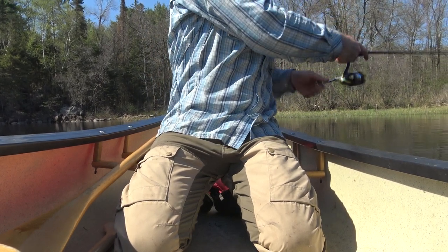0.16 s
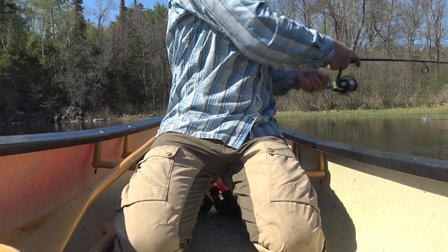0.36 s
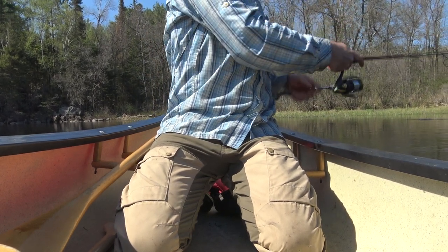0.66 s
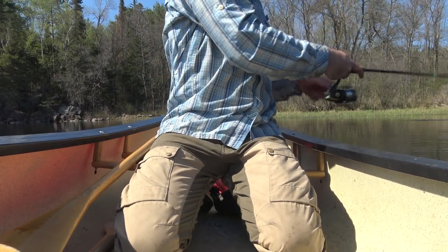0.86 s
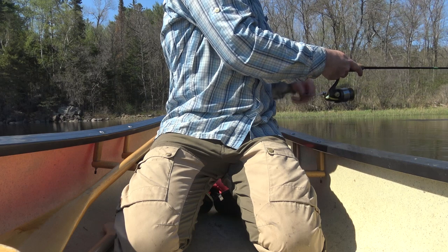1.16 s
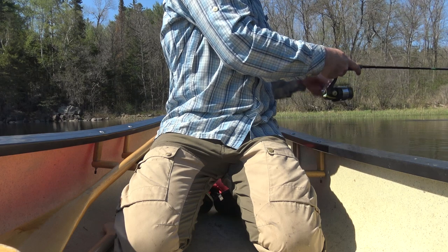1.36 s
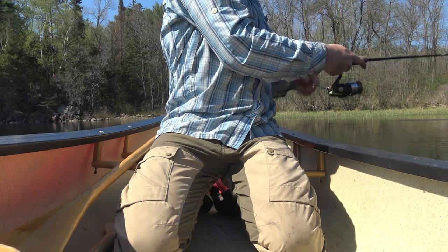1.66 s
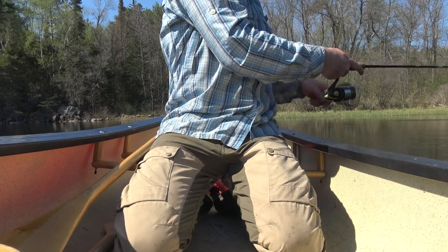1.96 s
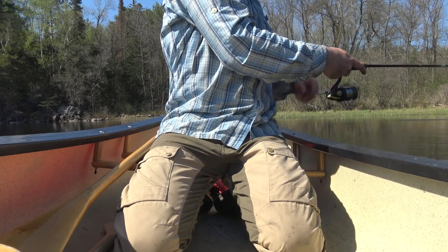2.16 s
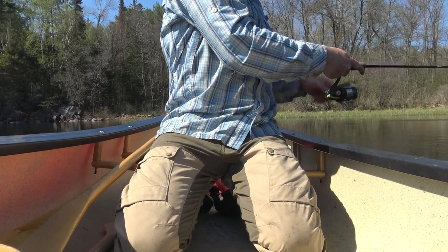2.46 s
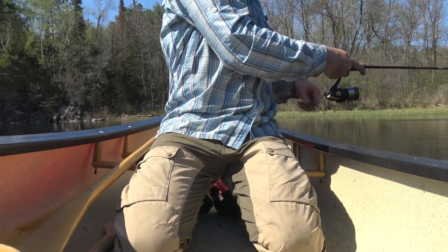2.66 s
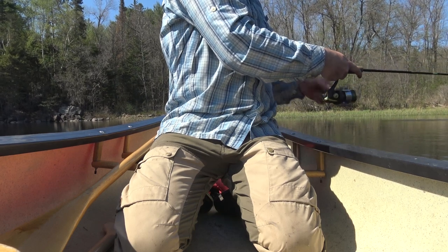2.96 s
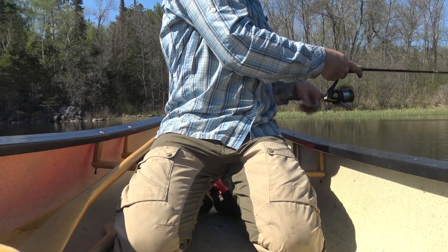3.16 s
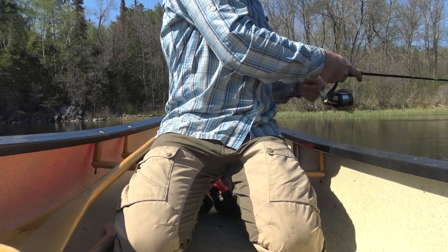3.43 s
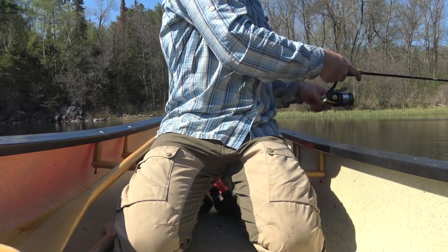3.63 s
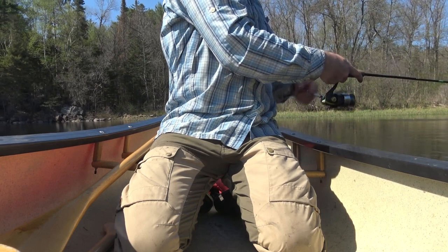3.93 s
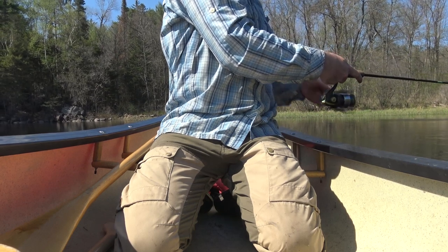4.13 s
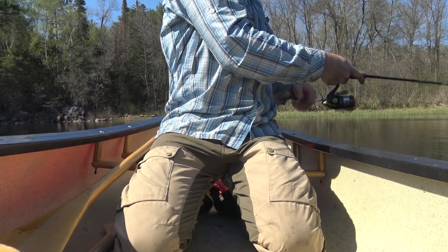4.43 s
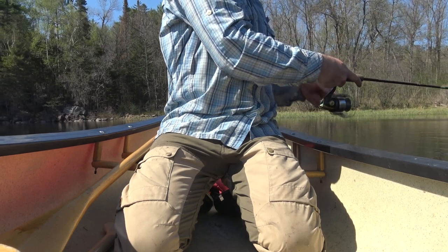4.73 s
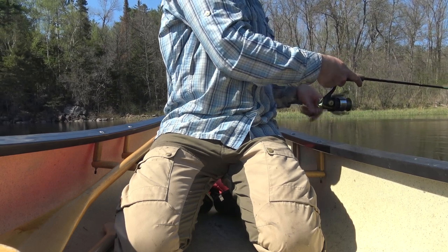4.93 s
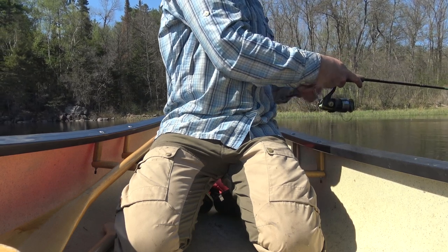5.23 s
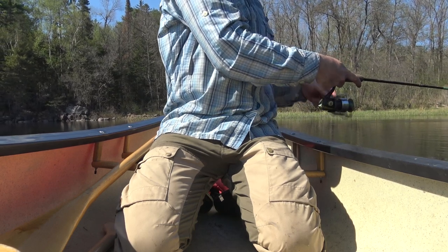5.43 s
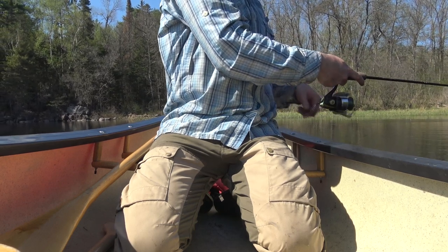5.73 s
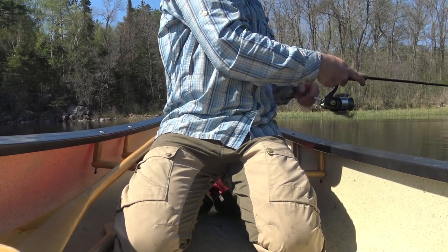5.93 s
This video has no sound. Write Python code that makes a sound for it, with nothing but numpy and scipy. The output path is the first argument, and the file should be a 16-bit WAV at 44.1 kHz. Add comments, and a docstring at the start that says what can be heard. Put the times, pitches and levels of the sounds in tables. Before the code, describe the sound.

Heard from a canoe on a calm lake, several toads hold long, fast-pulsed musical trills at different pitches, over a blurred distant chorus. Early on a fishing reel snaps shut very close with a sharp metallic clatter, soft brushing and a few water drops plinking. Small water laps follow, then sparse faint ticks and one dull hull knock. Breeze rumbles softly on the single microphone, and a far motor hums low near the end.

```python
"""Toads trill around a lake, heard from a canoe: trains of short tone pulses that swell, hold and slow as the toad tires.
Near callers overlap in front of a blurred, noise-made chorus, and the wooded shore answers with a diffuse tail.
Close by, a fishing reel snaps shut with soft thumps and ticks (struck resonances), line and sleeve brush (grains of
noise) and drops plink (rising bubble tones). Then water laps and a knock sounds on the hull (short thuds of tone and
noise). Behind are a far motor (one wavering sine) and a breeze rumbling on the microphone (shaped noise)."""
import sys
import numpy as np
from scipy import signal
from scipy.fft import rfft, irfft, next_fast_len
from scipy.io import wavfile
from scipy.ndimage import map_coordinates

SR = 44100
rng = np.random.default_rng(int(sys.argv[2]) if len(sys.argv) > 2 else 0)


def to_wav(sig):
    """Store sig (one row per channel, or 1-D mono) as 16-bit WAV at the path in sys.argv[1].

    Samples outside -1..1 are clipped; the rate is SR.
    """
    pcm = np.clip(np.atleast_2d(sig), -1, 1) * 32767
    pcm = np.round(pcm).astype(np.int16)
    wavfile.write(sys.argv[1], SR, pcm.T)  # frames by channels


N = 268569

# Relative spectrum of brushing friction, also of the splat of a drop: f/Hz, level/dB per Hz
RUSTLE_SPECTRUM = [(400, -33), (1100, -15), (2400, 3.5), (4200, 0.5), (6500, -17.5), (9000, -31),
                   (15000, -29)]


def amp(db):
    """Decibels to gain."""
    return 10 ** (np.asarray(db) / 20)


def unit(x):
    """Scale to rms 1."""
    return x / np.sqrt(np.mean(x ** 2) + 1e-20)


def along(points, hz):
    """Read (Hz, value) points on a log axis."""
    f, v = np.transpose(points)
    return np.interp(np.log(hz + 1), np.log(f + 1), v)


def curves(rows):
    """One value per sample for each column after the time."""
    s, *cols = np.transpose(rows)
    return [np.interp(np.arange(N) / SR, s, c) for c in cols]


def wobble(rate):
    """A smooth random curve, rate knots a second."""
    knots = rng.standard_normal(int(N * rate / SR) + 4)
    return map_coordinates(knots, [np.arange(N) * rate / SR])


def filtered(x, response):
    """x times a response of frequency."""
    m = next_fast_len(len(x) + 8192)
    return irfft(rfft(x, m) * response(np.fft.rfftfreq(m, 1 / SR)), m)[:len(x)]


def noise(spectrum):
    """Coloured noise of rms 1."""
    return unit(filtered(rng.standard_normal(N), lambda hz: amp(along(spectrum, hz))))


def add(track, s, sound):
    """Mix a sound into a track at time s."""
    part = track[max(round(s * SR), 0):][:len(sound)]
    part += sound[:len(part)]


def toads():
    """Near callers keep crisp pulses; the distant ones blur into a chorus of noise."""
    # When each near toad trills: start/s, end/s
    calls = [(-1, .66), (-1, 2.24), (-1, 2.35), (.6, 5.4), (.975, 5.41), (1.3, 5.02), (2.72, 6.6),
             (5.88, 7)]
    # Voice of each, in the same order; the fourth sits further along the shore:
    # pitch before scoop and sag f/Hz, basic pulse rate/(1/s), slowing/(share a second), held level/dB,
    # swell/s, fade/s, burst/s, ring/s, overtone/dB, noise skirt/dB, echo/dB
    voices = [(1930, 56, .03, -19, .1, 0.069, .0051, 0.0011, -28.5, -31, -14),
              (1800.5, 62.5, .005, -19.5, .1, 0.015, 0.0094, 0.00039, -28.5, -26.5, -21),
              (1812, 58.8, .012, -24.5, .1, 0.063, 0.0057, 0.0005, -29, -31.5, -20),
              (1737, 73, .03, -31.5, 0.38, 0.35, .0073, 0.00081, -21, -22.5, -7.5),
              (1493.5, 67.3, .029, -15.5, .065, 0.0023, 0.0064, 0.0042, -44, -27.5, -15.5),
              (1916, 60, .04, -31, 0.62, .01, 0.0045, 0.0021, -25, -15.5, -9.5),
              (1732, 65.6, .02, -20, 0.15, .01, 0.0077, .00057, -39.5, -38.5, -25),
              (1812, 68, .03, -22.5, .06, .01, .008, .001, -45, -37, -10.5)]
    # Relative spectrum of the whole lake's blurred chorus: f/Hz, level/dB per Hz
    chorus_spectrum = [(700, -34), (1000, -21), (1200, -11.5), (1400, -1.5), (1750, -2.5), (2000, -22),
                       (2600, -24), (3200, -26), (3400, -26.5), (3650, -43.5), (6000, -46)]
    near = sum(trill(*call, *voice) for call, voice in zip(calls, voices))
    chorus = amp(-36 + wobble(6.6)) * noise(chorus_spectrum)
    return near + chorus


def trill(start, end, pitch_hz, pulse_rate, slowing, level_db, swell_s, fade_s,
          burst_s, ring_s, overtone_db, skirt_db, echo_db):
    """A toad: the larynx lets through one burst of tone per pulse and the vocal sac rings on after it."""
    # Skirt: relative spectra of the faint noise spread around each pulse's tone,
    # one for high trills, one for the deep trill: f/Hz, level/dB per Hz
    high_skirt = [(600, -25), (1000, 1.5), (1300, 5.5), (2200, 2.5), (2600, -0.5), (3250, -6), (3900, -8),
                  (4400, -12.5), (5200, -15), (5900, -36.5), (9000, -38)]
    deep_skirt = [(600, -25), (1000, 5.5), (1300, 8), (2200, 1.5), (2600, -2.5), (2950, 2), (3300, -10.5),
                  (3650, -11.5), (3920, -2), (4300, -14), (5100, -12.5), (5900, -35.5), (9000, -38.5)]
    deep_below_hz = 1600
    swell_db = 23  # a trill grows from, and dies to, this far below its held level
    scoop, scoop_s = 0.11, 0.076  # the pitch starts flat by this share while the vocal sac fills
    sag_hz_per_s = 5.5
    eager, eager_s = 0.04, 0.25  # the first pulses come faster by this share
    spent, spent_s = 0.1, 0.22  # the last ones drag by this share
    glide = -0.0065  # pitch slide within one burst (share)
    upper_ratio = 1.965  # the overtone lies just under the octave

    now = np.arange(N) / SR
    age, left = np.maximum(now - start, 0), np.maximum(end - now, 0)
    haste = 1 + eager * np.exp(-age / eager_s) - spent * np.exp(-left / spent_s) + 0.005 * wobble(5)
    rate = pulse_rate * np.exp(-slowing * age) * haste
    bent = 1 - scoop * np.exp(-age / scoop_s) + 0.00067 * wobble(4)
    pitch = (pitch_hz - sag_hz_per_s * age) * bent
    drop_db = swell_db * (np.exp(-age / swell_s) + np.exp(-left / fade_s))
    level = level_db - drop_db + 0.5 * wobble(3.95)

    # A pulse starts whenever the running count passes a whole number.
    cycles = np.cumsum(rate * ((now >= start) & (now < end))) / SR
    onsets = np.flatnonzero(np.diff(np.ceil(cycles), prepend=0))

    t = np.arange(SR // 40) / SR
    progress = np.minimum(t / burst_s, 1)
    burst = np.sin(np.pi * progress)
    shape = signal.lfilter([1], [1, -np.exp(-1 / (ring_s * SR))], burst)
    shape /= np.sqrt(np.sum(shape ** 2) / SR)
    bend = 1 + glide * (progress - 0.5)

    tone, gate = np.zeros(N), np.zeros(N)
    for i, (turn, size, detune) in zip(onsets, rng.uniform(-0.89, 1, size=(600, 3))):
        # The vocal cords start afresh in every pulse, with a random phase.
        pulse_hz = pitch[i] * (1 + 0.0015 * detune)
        phase = np.pi * turn + 2 * np.pi * pulse_hz * np.cumsum(bend) / SR
        pulse = shape * amp(level[i] + 0.7 * size) / np.sqrt(rate[i])
        add(tone, i / SR, pulse * (np.sin(phase) + amp(overtone_db) * np.sin(upper_ratio * phase)))
        add(gate, i / SR, pulse)
    skirt = noise(deep_skirt if pitch_hz < deep_below_hz else high_skirt)
    voice = tone + amp(skirt_db) * gate * skirt
    return voice + amp(echo_db) * shore(voice)


def shore(x):
    """Diffuse answer of the trees, as strong as the sound itself: noise whose treble dies sooner."""
    # How long the wooded shore answers: f/Hz, t60/s
    decay = [(300, 0.75), (1800, 0.47), (6000, 0.052)]
    hz, t, z = signal.stft(rng.standard_normal(SR), SR, nperseg=256)
    fade = amp(-60 * t / along(decay, hz)[:, None])
    tail = signal.istft(z * fade, SR, nperseg=256)[1]
    return signal.fftconvolve(x, tail / np.linalg.norm(tail))[:N]


def reel():
    """The bail snaps over and rattles, then the gears tick: each contact strikes body and wire resonances."""
    # Contacts, first the bail snapping shut, then single ticks:
    # t/s, level/dB (before a common lift), brightness f/Hz, ring of the bail/dB
    contacts = [(.2646, -8.5, 13000, -5), (0.2723, -12.5, 4500, -2.5), (0.2768, -16.5, 16000, -6),
                (0.2836, -15.5, 9040, -6.5), (0.2916, -11, 18000, -8), (.2958, -13, 2980, -3.5),
                (.3042, -10, 13020, -7), (0.353, -17.5, 3820, -11.5), (.421, -25.5, 3000, -12),
                (.455, -28.5, 3500, -15), (0.538, -34.5, 8150, -14), (1.0132, -26, 5960, -9),
                (1.1954, -33.5, 3000, -9), (1.415, -26.5, 3540, -16), (1.883, -24, 2500, -10),
                (2.987, -33.5, 4500, -15), (3.586, -27.5, 3600, -19), (4.187, -27.5, 1960, -12),
                (5.4348, -32, 4500, -18), (5.851, -38, 3000, -16)]
    lift_db = 5.0
    # Resonances of the reel's body and wire bail: f/Hz, width/Hz, level/dB
    body_modes = [(1577, 166, 14), (2196, 123, 15), (3960, 950, -5), (6700, 1500, -4), (10300, 4900, -6.5),
                  (14500, 740, 0.5)]
    # Ring of the wire bail: f/Hz, level/dB (mean of a random spread), t60/s
    bail_modes = [(1450, -22, 0.22), (2176, -11, 0.067), (2292, -9.5, 0.07), (2365, -13, 0.098),
                  (2450, -18.5, .06), (2720, -26.5, 0.011), (3740, -23.5, 0.04), (3900, -19.5, 0.029),
                  (5200, -26.5, 0.053), (6570, -27.5, 0.035)]
    crack_t60_s, chatter_db, chatter_t60_s = 0.011, -17, 0.04

    def body(f):
        """Sum of the resonances with alternating signs."""
        return sum((-1) ** k * amp(db) * 1j * f * w / (c * c - f * f + 1j * f * w)
                   for k, (c, w, db) in enumerate(body_modes))

    out, t = np.zeros(N), np.arange(SR // 8) / SR
    for s, db, bright_hz, ring_db in contacts + rattle(count=10):
        decay = amp(-60 * t / crack_t60_s) + amp(chatter_db - 60 * t / chatter_t60_s)
        contact = 1.2 * rng.standard_normal(len(t)) * decay
        contact[0] += 3.5  # the hard first touch
        ring = sum(amp(level + rng.normal(0, 2) - 60 * t / life) * np.sin(2 * np.pi * (hz * t + rng.random()))
                   for hz, level, life in bail_modes)
        strike = filtered(contact, body) + amp(ring_db) * ring
        # A lower brightness makes a duller contact.
        coloured = filtered(strike, lambda f: 1 / (1 + 1j * f / bright_hz) ** 2)
        add(out, s, amp(db + lift_db) * coloured)
    return out


def rattle(count):
    """Loose contacts of the bail at random moments, ever weaker, as rows like those of the reel."""
    from_s, to_s = 0.39, 0.55
    first_db, loss_db_per_s = -30, 35  # before the reel's common lift
    bright_hz, ring_db = 4500, -8.5
    slots = (np.arange(count) + rng.random(count)) / count
    waits = slots * (to_s - from_s)
    return [(from_s + wait, first_db - loss_db_per_s * wait, bright_hz, ring_db) for wait in waits]


def rustle():
    """Line and sleeve brush: dense, clumped grains of friction; each brush rises quickly and fades."""
    # Brushes of line and sleeve: t/s, level/dB
    brushes = [(-.03, -46), (.26, -40), (.53, -50)]
    rise_s, fade_db_per_s = 0.018, 35.5
    stroke, t = np.zeros(N), np.arange(N) / SR
    for s, db in brushes:
        age = np.maximum(t - s, 0)
        stroke += amp(db - fade_db_per_s * age) * (1 - np.exp(-age / rise_s))
    clumps = amp(2.5 * wobble(70) + 3.5 * wobble(500))
    return stroke * unit(noise(RUSTLE_SPECTRUM) * clumps)


def drops():
    """Each drop splats and traps a small bubble whose pitch rises as it dies away."""
    # Drops plinking on the water beside the canoe: t/s, level/dB, starting pitch f/Hz
    plinks = [(.352, -22, 2300), (0.3965, -13.5, 2280), (0.419, -29, 2600), (.495, -20.5, 2300)]
    bubble_t60_s, splat_db, splat_t60_s = 0.036, -17, 0.025
    out, t = np.zeros(N), np.arange(SR // 16) / SR
    for s, db, hz in plinks:
        phase = 2 * np.pi * np.cumsum(hz * (1 + 0.2 * t / bubble_t60_s)) / SR
        bubble = amp(-60 * t / bubble_t60_s) * (1 - np.exp(-t / 0.0005)) * np.sin(phase)
        splat = amp(splat_db - 60 * t / splat_t60_s) * noise(RUSTLE_SPECTRUM)[:len(t)]
        add(out, s, amp(db) * (bubble + splat))
    return out


def thumps_laps_and_knock():
    """Short thuds: thumps with the reel's snap, then laps of water at the hull, and a knock that rings it."""
    # Thumps with the reel's snap (first three), then laps of water at the hull: t/s, level/dB, f/Hz
    thuds = [(.27, -41.5, 430), (.308, -32, 666), (.38, -38.5, 583), (.575, -30, 1090), (.609, -29.5, 1310),
             (.635, -38, 780), (.803, -40.5, 687), (5.062, -43.5, 412)]
    # Resonances of the knocked hull: f/Hz, level/dB (relative to the knock), t60/s
    modes = [(175, -3.5, .13), (305, -5, .1), (510, 1.5, .07)]
    thud_cycles = 81  # a thump or lap falls by 60 dB within this many cycles
    knock_s, knock_db = 2.403, -36
    out = np.zeros(N)
    for s, db, hz in thuds:
        add(out, s, amp(db) * thud(hz, thud_cycles / hz))
    knock = sum(amp(db) * thud(hz, t60) for hz, db, t60 in modes)
    add(out, knock_s, amp(knock_db) * knock)
    return out


def thud(hz, t60):
    """One dull, short resonance: a decaying mix of tone and narrow noise."""
    t = np.arange(SR // 4) / SR
    band = lambda f: 1 / (1 + ((f - hz) / (0.21 * hz)) ** 2)
    blur = unit(filtered(rng.standard_normal(len(t)), band))
    mix = 0.46 * np.sin(2 * np.pi * hz * t) + 0.92 * blur
    return mix * amp(-60 * t / t60) * (1 - np.exp(-t / 0.0014))


def motor():
    """Only the lowest order of a far motor carries across the water, louder as it speeds up."""
    # Speed of the far motor: t/s, pitch f/Hz (before a slight waver)
    speed = [(1.8, 94.5), (3.9, 96.24), (4.6, 100), (4.9, 106.6), (5.15, 106.9), (5.45, 115.5),
             (5.65, 116.1), (6.09, 118.1)]
    idle_db, db_per_hz = -53.5, 0.44
    hz, = curves(speed)
    db = idle_db + db_per_hz * (hz - hz[0]) + 2.3 * wobble(11)
    phase = 2 * np.pi * np.cumsum(hz * (1 + 0.008 * wobble(3.6))) / SR
    return amp(db) * np.sin(phase)


def breeze():
    """Open-air hiss and gusts on the microphone; the harder it blows, the higher the rumble reaches."""
    # Strength of the breeze at the microphone: t/s, level/dB (before lift and flutter)
    strength = [(0.0, -33), (0.25, -25.5), (0.44, -38), (0.63, -27), (0.66, -35), (1.05, -40),
                (1.41, -34.5), (1.46, -37), (2.47, -44), (2.51, -40), (2.61, -41.5), (3.0, -38),
                (3.31, -46.5), (4.38, -41.5), (4.53, -45), (6.02, -53), (6.09, -58)]
    # Relative spectra of open-air hiss, rumble and the higher-reaching gusts: f/Hz, level/dB per Hz
    air_spectrum = [(100, 5.5), (200, 4), (350, -2.5), (700, -4.5), (1500, -5), (3000, -10.5), (4500, -18),
                    (8000, -23.5), (15500, -25)]
    rumble_spectrum = [(8.8, -12.5), (15, 10.5), (27, 3.5), (47, -3.5), (73, -7.5), (124, -24),
                       (220, -31.5), (290, -76.5), (480, -120)]
    gust_spectrum = [(30, -19.5), (55, -1.5), (70, -3.5), (95, -11), (140, -25), (300, -56)]
    air_db, rumble_lift_db = -45.5, 4
    peak_gust_db, gust_growth = -32, 2.2  # level in the strongest gust; its dB for each dB of breeze
    strength_db, = curves(strength)
    flutter_db = 1.1 * wobble(9.2)
    rumble = amp(strength_db + rumble_lift_db + flutter_db) * noise(rumble_spectrum)
    gust_db = peak_gust_db + gust_growth * (strength_db - strength_db.max())
    buffet = amp(gust_db + flutter_db) * noise(gust_spectrum)
    return amp(air_db) * noise(air_spectrum) + rumble + buffet


def scene():
    """Everything as it reaches the canoe, on one channel."""
    near = toads() + reel() + rustle() + drops() + thumps_laps_and_knock()
    return (near + motor() + breeze())[None]


def record(dry):
    """The recorder keeps nothing above its band limit."""
    top_hz = 15800
    return np.array([filtered(channel, lambda hz: hz < top_hz) for channel in dry])


dry = scene()
out = record(dry)
to_wav(out)
```